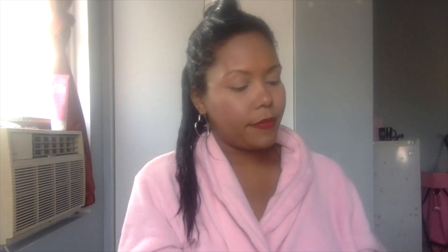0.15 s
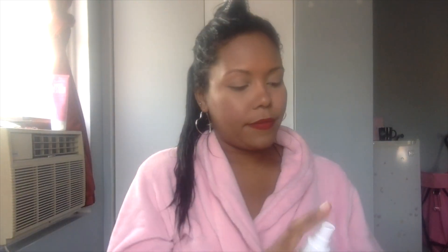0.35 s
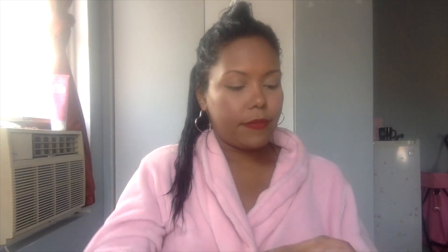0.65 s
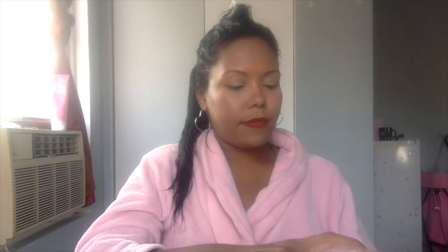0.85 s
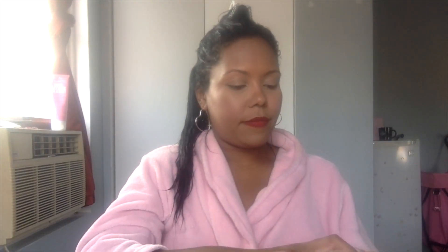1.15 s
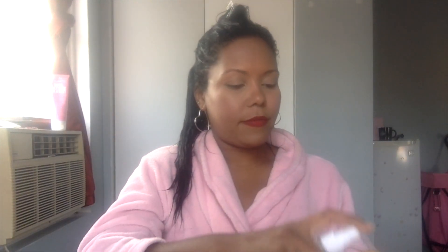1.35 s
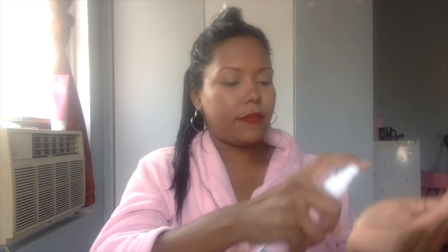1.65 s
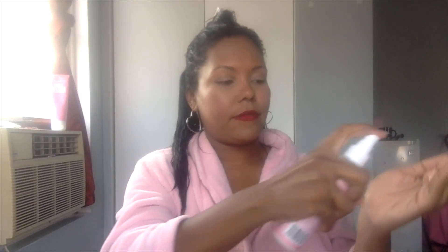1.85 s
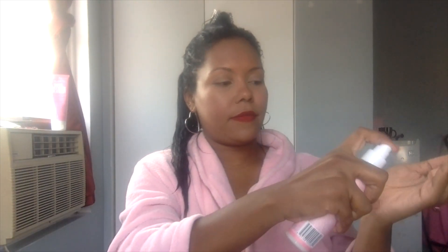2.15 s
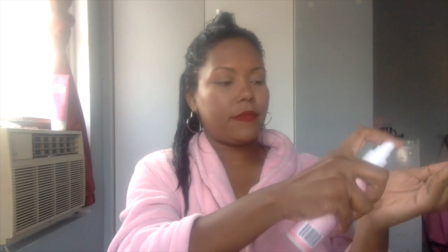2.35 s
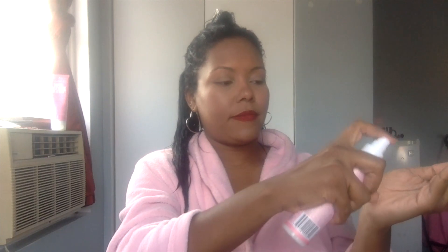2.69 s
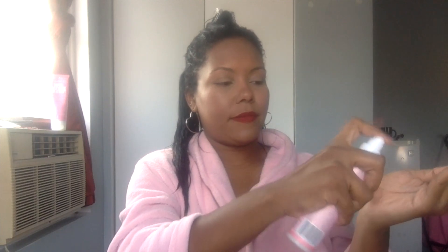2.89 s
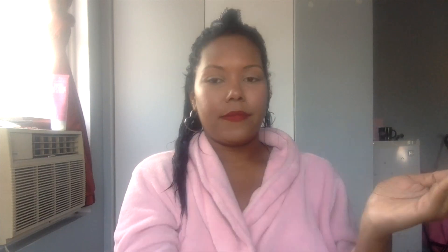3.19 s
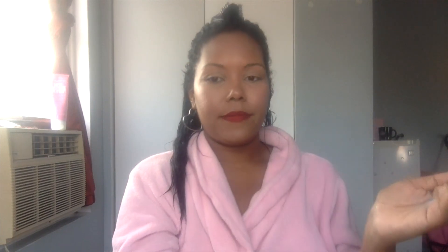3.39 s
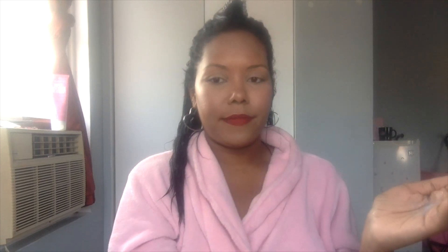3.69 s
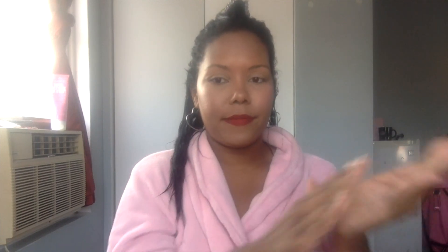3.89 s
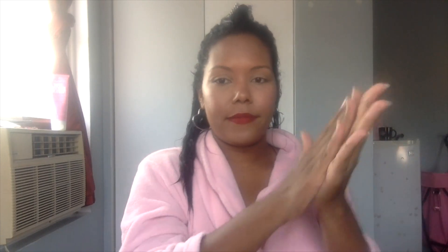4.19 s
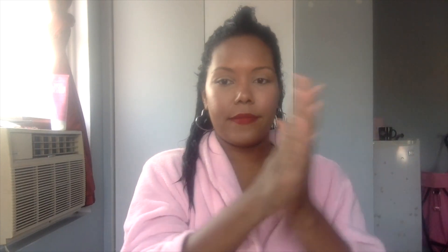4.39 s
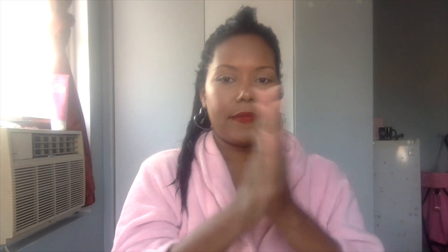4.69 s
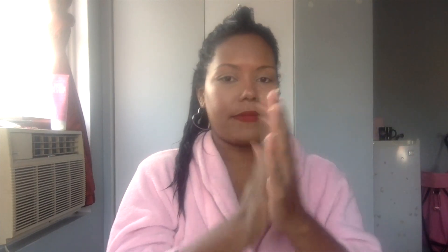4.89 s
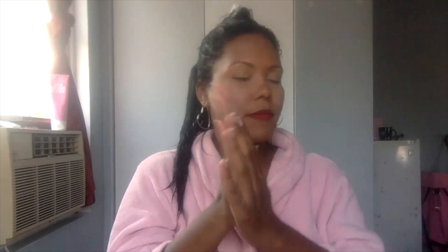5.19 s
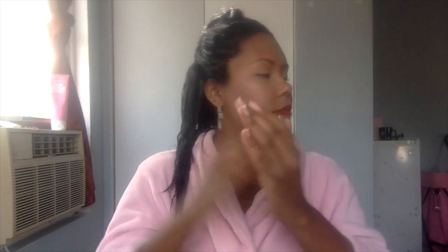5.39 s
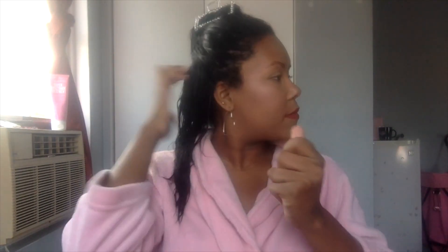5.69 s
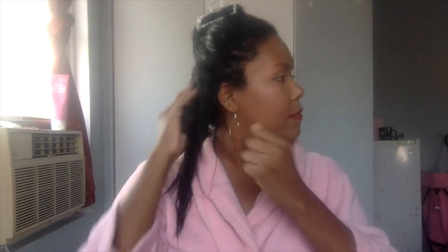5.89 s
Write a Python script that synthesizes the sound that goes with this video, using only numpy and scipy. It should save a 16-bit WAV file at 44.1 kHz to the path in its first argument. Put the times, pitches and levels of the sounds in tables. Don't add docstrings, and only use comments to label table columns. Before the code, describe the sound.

A quiet small room hums low, with faint air and cloth rustle. At about 0.1 s a plastic bottle base cracks onto a wooden table with a small thud. Sparse, tiny, falling bird chips begin. Small taps precede a soft, slower spray hiss at 1.1 s, lasting about a quarter second. Sharper valve snaps and a little piston squeak start a quick hiss at 2.1 s, then another at 2.7 s; plastic ticks surround them. At 3.4 s a very loud, tight double knock strikes the wood, clipping the small microphone. Palms rub lightly from 4.0 s, a hard bright clack rings and bounces at 4.6 s, a dry flick snaps at 4.86 s, and wet pats cluster at 4.95 s, trailing into soft rubbing. Light taps come around 5.3 s. High bird chips, now denser, continue to the end at six seconds.

```python
import sys
import numpy as np
from scipy import signal
from scipy.fft import rfft, irfft, next_fast_len
from scipy.io import wavfile
from scipy.ndimage import uniform_filter1d, map_coordinates

SR = 44100
rng = np.random.default_rng(int(sys.argv[2]) if len(sys.argv) > 2 else 0)


def dump(signal):
    limited = np.clip(np.atleast_2d(signal).T, -1, 1)
    pcm = np.round(limited * 32767).astype(np.int16)
    wavfile.write(sys.argv[1], SR, pcm)


def elevation(decibels):
    levels = np.asarray(decibels, float)
    return 10 ** (levels / 20)


N = 266805

# time in seconds, level in dB.
STIR = [(0, -64.5), (.4, -68), (.9, -70), (1.28, -60.5), (1.45, -64), (1.85, -71), (2.25, -62), (2.6, -65),
        (2.9, -60), (3.35, -66), (3.55, -62.5), (4.3, -65.5), (4.85, -60), (5.3, -61), (5.75, -66)]
# frequency in Hz, level in dB per Hz.
HUM_COLOUR = [(15, -55), (25, -20), (37, -25), (67, -12), (97, 7.5), (119, 0), (162, -9.5), (267, 1.5),
              (354, -3), (501, -10.5), (700, -12), (910, -44), (1540, -120)]
AIR_COLOUR = [(290, -32), (500, -12.5), (763, -4.5), (1020, 1), (1560, -5), (1980, -9.5), (3140, -8.5),
              (4050, -10.5), (5970, -10.5), (7880, -18.5), (9000, -25.5), (11700, -51), (19800, -120)]
RUSTLE_COLOUR = [(4000, -31.5), (7000, 0.5), (9000, 4.5), (12000, 2), (15500, 2), (16200, -34.5)]
# frequency in Hz, time to fall 60 dB in seconds.
WALL_DECAY = [(100, 0.36), (500, 0.18), (2000, 0.31), (6000, 0.3), (8000, .24), (10000, .15), (14000, 0.12)]
# delay in seconds, level in dB.
WALL_ECHOES = [(.0045, -8.5), (.008, -8.5), (0.016, -19), (0.024, -24.5), (0.028, -23)]

# start in seconds, length in ms, starting pitch in Hz, peak in dB.
HIGH_CHIPS = [(.665, 6.4, 6470, -48), (.8635, 5.1, 6640, -52.5), (.9545, 9, 6450, -57.5),
              (1.4712, 7.2, 6620, -36.5), (1.5739, 6.8, 6500, -34), (1.7834, 10.4, 6460, -44),
              (2.2534, 8.6, 6560, -36), (2.4829, 13, 6600, -56), (2.6151, 10.5, 6520, -27.5),
              (3.073, 14.4, 6700, -31), (3.4462, 11, 6700, -28), (3.5614, 10, 6350, -28.5),
              (3.7445, 7.4, 7410, -44.5), (3.7889, 11.2, 6530, -25.5), (3.8118, 17, 7100, -42),
              (4.2663, 14.2, 7020, -32.5), (4.631, 12, 6630, -25.5), (4.738, 14, 6600, -29.5),
              (4.9917, 8, 6460, -30), (5.0834, 7.8, 6330, -31), (5.4436, 10.9, 6800, -25),
              (5.5604, 11.7, 6550, -29.5), (5.5848, 9.5, 6600, -40), (5.9395, 16, 6700, -42)]
# start in seconds, length in ms, starting pitch in Hz, peak in dB.
MID_CHIPS = [(1.2646, 12, 6500, -43.5), (1.8792, 6.9, 6200, -32), (2.3856, 12, 6130, -29),
             (2.5417, 8, 6080, -23), (2.5796, 6, 5900, -55), (2.7483, 12.4, 6180, -26),
             (2.9852, 6.6, 6130, -27), (3.2287, 9.8, 5890, -31), (3.3758, 3.6, 5840, -28),
             (3.7205, 6.9, 5830, -31.5), (3.8677, 4.5, 5780, -32), (3.9116, 13, 6410, -23.5),
             (4.1885, 6.6, 6200, -32), (4.3322, 10, 5920, -58.5), (4.403, 20, 6590, -31.5),
             (4.5706, 4.2, 5760, -31), (5.2226, 9.2, 6320, -30), (5.3763, 3.05, 5600, -37),
             (5.718, 15, 5740, -47), (5.8702, 7.9, 5830, -46)]
# start in seconds, length in ms, starting pitch in Hz, peak in dB.
LOW_CHIPS = [(.0554, 8.1, 5500, -40), (.3717, 15, 5240, -34), (2.9348, 9.4, 5110, -42.5),
             (3.327, 12, 4577, -41), (3.6677, 12.3, 4570, -40.5), (4.0139, 9.5, 5460, -35.5),
             (4.0553, 12.2, 5660, -33)]
# start in seconds, length in ms, starting pitch in Hz, peak in dB.
PEEPS = [(.1492, 11, 5130, -36.5), (1.0147, 7, 4800, -52), (1.4128, 19, 5400, -57),
         (3.1723, 9.7, 5196, -52.5), (4.1171, 9.7, 7090, -54), (4.1386, 13.5, 5260, -43),
         (4.191, 6.3, 7200, -50), (4.3501, 8, 5450, -41.5), (4.7345, 5, 7150, -28.5),
         (4.84, 12.2, 5360, -38.5), (5.0785, 8.5, 7100, -36), (5.09, 25, 7250, -50),
         (5.115, 34, 7250, -49.5), (5.6711, 5.5, 8170, -57.5)]
# frequency in Hz, level in dB.
BEAK = [(3300, -26), (4000, -15), (4550, -17), (5000, -3), (6000, -1), (8500, 0.5)]
# time in seconds, pitch in Hz, level in dB.
WHISTLE = [(3.365, 7170, -61.5), (3.385, 7140, -67), (3.405, 7290, -62), (3.475, 7720, -57.5),
           (3.597, 7305, -49.5), (3.617, 7360, -69), (3.659, 7500, -53), (3.671, 7530, -78.5),
           (3.751, 7427, -80), (3.77, 7500, -88.5)]

# time in seconds, peak in dB.
CREAKS = [(2.402, -56), (2.465, -50), (2.665, -49), (2.991, -51), (3.021, -55), (3.096, -50), (3.105, -41),
          (5.279, -44), (5.349, -47)]
# frequency in Hz, level in dB per Hz.
CREAK_COLOUR = [(1000, -30), (2500, -4), (6000, 0), (9000, 0), (15000, -8), (16200, -35)]
# time in seconds, peak in dB, ring in Hz, second ring in Hz,
# level of the second ring in dB.
TAPS = [(1.046, -47.5, 970, 3120, -16), (1.279, -36, 4620, 3900, -11), (1.31, -46, 7030, 4000, -16),
        (1.338, -37, 1390, 2470, 1), (2.044, -56, 7600, 11200, -10), (2.392, -56, 7300, 8100, -5),
        (2.421, -51, 7300, 6900, -8), (2.465, -51, 9000, 4900, 0), (2.668, -49, 7100, 8450, -7),
        (2.989, -48, 2780, 2230, -5), (3.099, -34.5, 8330, 6940, 0.5), (3.103, -40.5, 7540, 10000, -4.5),
        (5.176, -42.5, 880, 1460, -4), (5.278, -25.5, 3200, 2330, -6.5), (5.347, -28, 1484, 3930, -4),
        (5.371, -39, 2720, 2480, 0.5)]

# start in seconds, attack in seconds, hold in seconds, release in seconds, level in dB.
RUBS = [(.06, 0.012, 0.055, 0.036, -51), (4.0, 0.062, 0.057, 0.13, -58.5), (5.25, 0.061, .05, .15, -58.5),
        (4.36, 0.068, 0.04, 0.089, -43), (4.935, 0.018, .03, 0.13, -40.5), (5.03, 0.084, 0.0077, 0.77, -51)]
# frequency in Hz, level in dB per Hz.
SKIN_COLOUR = [(880, -47.5), (1500, -24), (2340, -18), (2930, -7), (3740, -9.5), (4190, -7), (5120, -11),
               (7440, -7.5), (9910, -23.5), (12000, -47), (15600, -54.5), (22000, -120)]
# time in seconds, peak in dB.
PATS = [(4.9472, -17), (4.953, -22.5), (4.9616, -18), (4.965, -24), (4.970, -20.5), (4.9735, -46),
        (4.986, -45)]
# frequency in Hz, level in dB per Hz.
PAT_COLOUR = [(200, -30), (500, -8.5), (950, 1), (1800, -5.5), (2800, 3.5), (4500, -8.5), (6000, -40),
              (8000, -20), (9900, -17.5), (11800, -38.5), (14500, -29), (16000, -56)]
# time in seconds, peak in dB.
FLICKS = [(4.8625, -0.5)]
# frequency in Hz, level in dB per Hz.
FLICK_COLOUR = [(470, -76), (800, -62), (1850, -27.5), (2210, -17), (2800, -6.5), (4290, -1), (6820, -10.5),
                (7830, -21), (8340, -43), (16000, -61)]
# time in seconds, peak in dB.
CLACKS = [
    (4.5795, -14),
    (4.581, 1),
]
# time in seconds, peak in dB.
REBOUNDS = [
    (4.5897, -16),
    (4.5915, -10.5),
    (4.611, -15),
]
# frequency in Hz, width in Hz, level in dB.
CLACK_RINGS = [(1301, 188, 1), (2943, 250, -9), (3340, 110.4, 4), (3450, 22, 8.5), (3650, 350, -1),
               (4050, 200, -10), (6700, 260, -1), (7150, 160, 5), (7520, 180, -5), (8493, 240, -18.5),
               (10200, 230, -21.5), (12300, 1200, -15), (14350, 250, -25)]

# time in seconds, thud in dB, crack in dB, contact time in seconds.
BLOWS = [
    (0.072, -22.5, -27, 0.0046),
    (0.094, -28.5, -3.5, 0.00065),
    (0.102, -19, -15, 0.0003),
    (3.396, -50.5, -40, 0.0013),
    (3.409, 1, 0.5, 0.00016),
    (3.412, 1.5, -10.5, 0.00021),
]
# frequency in Hz, width in Hz, level in dB.
TABLE_RINGS = [(98.5, 69, -11.5), (128, 24, 0), (189, 40, -4), (273, 52, -4), (383.6, 37, 1), (562, 87, -7),
               (830, 65, -5), (999, 38, -4), (1267, 84, -9.5)]
# frequency in Hz, level in dB per Hz.
CRACK_COLOUR = [(500, -13), (1000, -4.5), (1700, -12.5), (2700, -11.5), (3400, -12), (4150, -9.5),
                (5000, -16.5), (9600, -15), (14500, -27), (16400, -52.5)]
# frequency in Hz, width in Hz, level in dB.
RIM_RINGS = [(1480, 220, -31), (4400, 470, 16.5), (4940, 490, 17.5), (7080, 270, -37), (9150, 630, 5),
             (13000, 1000, -22)]

# time in seconds, length in ms, pitch in Hz, peak in dB.
SQUEAKS = [(1.058, 6, 3060, -52.5), (2.027, 5, 3080, -46), (2.0425, 6.5, 3080, -29.5),
           (2.084, 4, 3100, -38), (2.094, 5, 3460, -43), (2.661, 6, 3070, -38), (2.666, 6, 3210, -38.5),
           (2.700, 4, 4830, -34), (2.703, 4, 4400, -32), (2.702, 4, 3350, -44)]
# time in seconds, peak in dB, level in dB of the puff after it against the snap.
VALVE_SNAPS = [(1.106, -43, -4.5), (1.117, -42, -4), (1.1292, -26.5, -12), (1.1324, -30, -13),
               (1.1364, -29, -14), (2.0716, -13.5, -27), (2.080, -30, -9.5), (2.0858, -15, -19.5),
               (2.087, -25, -21), (2.1259, -13.5, -22.5), (2.130, -26, -9.5), (2.150, -38, -28),
               (2.178, -17.5, -24), (2.1793, -11, -23), (2.2268, -18, -22.5), (2.229, -16, -16.5),
               (2.7005, -19, -12), (2.703, -7, -21), (2.706, -14, -20), (2.7762, -23, -15)]
# frequency in Hz, level in dB per Hz.
SNAP_COLOUR = [(1470, -61.5), (3000, -35), (4730, -38), (5900, -23.5), (7400, 1), (8860, -8), (10700, -9),
               (11900, 4), (13200, -6.5), (14400, 2.5), (15700, -2.5), (16300, -28)]
# start in seconds, attack in seconds, hold in seconds,
# release in seconds, level in dB.
JETS = [
    (1.07, 0.063, 0.093, 0.08, -40),
    (2.07, .003, 0.19, 0.028, -41.5),
    (2.699, .007, .16, 0.032, -40),
]
# start in seconds, attack in seconds, hold in seconds,
# release in seconds, level in dB.
MISTS = [
    (1.085, 0.062, 0.083, 0.062, -36.5),
    (2.11, 0.069, 0.082, 0.013, -51),
    (2.70, 0.026, 0.14, 0.02, -50),
]
# frequency in Hz, level in dB per Hz.
FIRST_JET_COLOUR = [(5000, -41), (6000, -12), (7300, -1), (8600, -6.5), (10000, 0), (10800, -11),
                    (11800, -10), (13200, -25), (14300, -7), (15500, -8), (16000, -45)]
JET_COLOUR = [(4500, -40), (5630, -12.5), (6670, -2), (7300, 4), (8700, -8.5), (9960, 1), (10800, -9),
              (11800, 0.5), (12600, -10), (13300, -16.5), (14200, -3), (15600, -1.5), (16100, -36.5)]
MIST_COLOUR = [(530, -50.5), (900, -26), (1580, -15), (1960, -22), (2700, -3.5), (4300, -1), (5150, -1),
               (5600, -15), (6500, -19), (8450, -42.5), (14300, -120)]
LATE_MIST_COLOUR = [(350, -39.5), (600, -12.5), (1270, -10), (1320, -11), (2000, -13), (2840, -1.5),
                    (3230, -3.5), (4230, -2.5), (6500, -7.5), (8450, -35), (14300, -120)]

HUM_DB, AIR_DB, RUSTLE_DB = -64.5, -64, -76.5
HUM_FOLLOWS, RUSTLE_FOLLOWS = 0.89, 1
JET_SAG_DB_PER_S, FIRST_SAG_DB_PER_S, MIST_SAG_DB_PER_S, RUB_SAG_DB_PER_S = 30.5, 13, -7, 99.5
EDGE_DB = 37
TAP_T60_S, TAP_CLICK_DB = 0.013, -12
HOOK_MS = 0.67


def unit(x):
    return x / np.sqrt(np.mean(x ** 2) + 1e-20)


def along(points, hz):
    f, v = np.transpose(points)
    return np.interp(np.log(hz + 1), np.log(f + 1), v)


def curves(rows):
    s, *columns = np.transpose(rows)
    return [np.interp(np.arange(N) / SR, s, column) for column in columns]


def wobble(rate):
    knots = rng.standard_normal(int(N * rate / SR) + 4)
    return map_coordinates(knots, [np.arange(N) * rate / SR])


def noise(colour, grain_db, rate, patchy_db=1.5):
    grainy = rng.standard_normal(N) * elevation(grain_db * wobble(rate))
    z = signal.stft(grainy, nperseg=256)[2]
    patches = uniform_filter1d(rng.standard_normal(z.shape), size=5, axis=0)
    patches = uniform_filter1d(patches, size=12, axis=1)
    x = signal.istft(z * elevation(patchy_db * unit(patches)), nperseg=256)[1][:N]
    m = next_fast_len(N + 8192)
    gain = elevation(along(colour, np.fft.rfftfreq(m, 1 / SR)))
    return unit(irfft(rfft(x, m) * gain, m)[:N])


def swells(rows, sag_db_per_s):
    t, out = np.arange(N) / SR, np.zeros(N)
    for s, attack, hold, release, db in rows:
        climb = EDGE_DB * np.minimum((t - s) / attack - 1, 0)
        sink = EDGE_DB * np.maximum(t - s - attack - hold, 0) / release
        sag = sag_db_per_s * np.maximum(t - s - attack, 0)
        out += elevation(np.maximum(db + climb - sink - sag, -200))
    return out


def causal(colour, size=2048):
    c = irfft(np.log(elevation(along(colour, np.fft.rfftfreq(size, 1 / SR))) + 1e-6))
    c[1:size // 2] *= 2
    c[size // 2 + 1:] = 0
    return irfft(np.exp(rfft(c)))


def resonant(modes, size=4096, notched=False):
    f = np.fft.rfftfreq(size, 1 / SR)
    response = 0
    for k, (centre, width, db) in enumerate(modes):
        sign = 1 if notched else (-1) ** k
        response = response + sign * elevation(db) * 1j * f * width / (centre * centre - f * f + 1j * f * width)
    return irfft(response) * np.hanning(2 * size)[size:]


def contact(impulse, t60, push=1e-6, scrape_db=-9):
    t = np.arange(SR // 10) / SR
    force = elevation(scrape_db - 60 * t / t60) * rng.standard_normal(len(t))
    force[0] = 1
    force = signal.fftconvolve(force, (1 + t * SR) * np.exp(-t / push))
    x = signal.fftconvolve(force, impulse)
    return x / abs(x).max()


def in_room(x, wet_db, echo_db, damping=1):
    hz, t, z = signal.stft(rng.standard_normal(SR // 3), SR, nperseg=256)
    decay = elevation(-60 * damping * t / along(WALL_DECAY, hz)[:, None])
    tail = signal.istft(z * decay, SR, nperseg=256)[1]
    i = np.arange(len(tail))
    tail *= 1 - np.exp(-i / (0.00099 * SR))
    tail *= elevation(-25 * (i / (.22 * SR)) ** 4)
    tail *= elevation(wet_db) / np.linalg.norm(tail)
    tail[0] = 1
    for s, db in WALL_ECHOES:
        tail[round(s * SR * rng.uniform(.9, 1.1))] += elevation(db + echo_db) * rng.choice([-1, 1])
    return signal.fftconvolve(x, tail)


def add(track, s, x):
    part = track[round(s * SR):][:len(x)]
    part += x[:len(part)]


def hits(events, impulse, t60, wet_db, echo_db, damping=1.5, scrape_db=-9):
    out = np.zeros(N)
    for s, db in events:
        hit = contact(impulse, t60, scrape_db=scrape_db)
        add(out, s, elevation(db) * in_room(hit, wet_db, echo_db, damping))
    return out


def room_tone():
    stir_db = curves(STIR)[0]
    stir_db = stir_db - stir_db.mean()
    hum_gain = elevation(HUM_DB + HUM_FOLLOWS * stir_db + 2.3 * wobble(4.3))
    air_gain = elevation(AIR_DB + stir_db + 0.92 * wobble(7.5))
    rustle_gain = elevation(RUSTLE_DB + RUSTLE_FOLLOWS * stir_db)
    hum = hum_gain * noise(HUM_COLOUR, grain_db=-0.97, rate=33)
    air = air_gain * noise(AIR_COLOUR, grain_db=0.96, rate=71)
    return hum + air + rustle_gain * noise(RUSTLE_COLOUR, grain_db=0.9, rate=330)


def whistle():
    hz = curves(WHISTLE)[0]
    points = [(s, db) for s, _, db in WHISTLE]
    start, end = (points[0][0] - .01, -120), (points[-1][0] + .02, -120)
    loud = elevation(curves([start, *points, end])[0])
    tone = np.sin(2 * np.pi * np.cumsum(hz + 40 * wobble(60)) / SR)
    tone = loud * elevation(4.0 * wobble(130)) * tone
    return elevation(0.5) * in_room(tone, wet_db=-1.5, echo_db=-1.0, damping=0.71)[:N]


def chip(ms, start_hz, db, fall, peak_ms, t):
    length, slope = ms / 1000, fall * 1000
    top = np.clip(peak_ms / ms, .05, .7) * length
    rise = np.sin(np.pi / 2 * np.clip((t - t[0]) / (top - t[0]), 0, 1)) ** 2
    past = np.maximum(t - top, 0) / (length - top)
    fade = np.minimum(12 * past ** 2.2, 22)
    fade += 60 * np.maximum(t / length - 1.5, 0) ** 2
    hz = abs(start_hz - slope * (np.hypot(np.maximum(t, 0), HOOK_MS / 1000) - HOOK_MS / 2000))
    fade -= along(BEAK, hz) + 1.7 * np.sin(2 * np.pi * (300 * t + rng.uniform()))
    note = rise * elevation(-fade) * np.sin(2 * np.pi * np.cumsum(hz) / SR)
    return elevation(db) * in_room(note, wet_db=-15, echo_db=-8.5, damping=1.6)


def birds():
    out, t = np.zeros(N), np.arange(SR // 25) / SR - .0015
    # notes, fall in Hz per ms, time to the peak in ms
    voices = [(HIGH_CHIPS, 130, 1.4), (MID_CHIPS, 110, 2.4), (LOW_CHIPS, 70, 4.7), (PEEPS, 18, 2.6)]
    for notes, fall, peak_ms in voices:
        for s, ms, start_hz, db in notes:
            add(out, s + t[0], chip(ms, start_hz, db, fall, peak_ms, t))
    return out + whistle()


def creaks():
    return hits(CREAKS, causal(CREAK_COLOUR), 0.004, wet_db=-12, echo_db=-12, scrape_db=-5)


def taps():
    out, t = np.zeros(N), np.arange(SR // 10) / SR
    for s, db, hz, second_hz, second_db in TAPS:
        ring = np.sin(2 * np.pi * hz * t) + elevation(second_db) * np.sin(2 * np.pi * second_hz * t)
        ring *= elevation(-60 * t / TAP_T60_S) * (1 - np.exp(-t / 0.00061)) ** 2
        click = uniform_filter1d(rng.standard_normal(len(t)), size=5)
        ring += elevation(TAP_CLICK_DB - 60 * t / 0.0026) * (t * SR > 6) * click
        soft = uniform_filter1d(ring, size=2) / abs(ring).max()
        add(out, s, elevation(db) * in_room(soft, wet_db=-9.5, echo_db=-5.0, damping=1.2))
    return out


def rubbing():
    return swells(RUBS, RUB_SAG_DB_PER_S) * noise(SKIN_COLOUR, grain_db=2.0, rate=410)


def pats():
    return hits(PATS, causal(PAT_COLOUR), 0.008, wet_db=-1.5, echo_db=-26, scrape_db=-1)


def flick():
    return hits(FLICKS, causal(FLICK_COLOUR), 0.0019, wet_db=-3.5, echo_db=-4, damping=1.19, scrape_db=-20)


def clack():
    shine = causal([(500, -8.5), (1300, 4), (13000, -2), (14600, -6), (15200, -30.5)])
    body = signal.fftconvolve(resonant(CLACK_RINGS, size=8192, notched=True), shine)
    dull_body = signal.fftconvolve(body, causal([(4000, -1), (7500, -2.5), (10000, -23), (16000, -44)]))
    out = hits(CLACKS, body, 0.012, wet_db=-3.5, echo_db=-5, damping=0.54)
    return out + hits(REBOUNDS, dull_body, 0.024, wet_db=-9.0, echo_db=-6, damping=1.0)


def table():
    rim = signal.fftconvolve(resonant(RIM_RINGS), resonant([(6250, 5800, 0)]))
    out = hits([(.0715, -19)], rim, 0.007, wet_db=-16.0, echo_db=-16)
    for s, db, crack_db, push in BLOWS:
        blow = contact(resonant(TABLE_RINGS, size=16384), 0.0054, push, scrape_db=-24)
        crack = contact(causal(CRACK_COLOUR), 0.025, 0.2 * push, scrape_db=-12.0)
        add(blow, 0, elevation(crack_db) * crack)
        add(out, s, elevation(db) * in_room(blow, wet_db=-7.0, echo_db=-2, damping=1.11))
    return signal.sosfilt(signal.butter(4, 82, "high", fs=SR, output="sos"), out)


def squeaks():
    out = np.zeros(N)
    for s, ms, hz, db in SQUEAKS:
        t = np.arange(int(ms * SR / 1000)) / SR
        blip = abs(np.sin(np.pi * t / t[-1])) ** 1.2 * np.sin(2 * np.pi * hz * t)
        add(out, s, elevation(db) * in_room(blip, wet_db=-15.5, echo_db=-10, damping=1.4))
    return out


def valve():
    events = [(s, db) for s, db, _ in VALVE_SNAPS]
    return hits(events, causal(SNAP_COLOUR), 0.004, wet_db=-13.5, echo_db=-14.5, scrape_db=-12)


def spray():
    jet, t = swells(JETS[1:], JET_SAG_DB_PER_S), np.arange(SR // 5) / SR
    for s, db, puff_db in VALVE_SNAPS:
        add(jet, s, elevation(db + puff_db - 60 * t / 0.031))
    first_jet = swells(JETS[:1], FIRST_SAG_DB_PER_S)
    first_mist = swells(MISTS[:1], MIST_SAG_DB_PER_S)
    late_mist = swells(MISTS[1:], MIST_SAG_DB_PER_S)
    hiss = jet * noise(JET_COLOUR, grain_db=2.5, rate=2400, patchy_db=1.0)
    hiss += first_jet * noise(FIRST_JET_COLOUR, grain_db=2.1, rate=1000, patchy_db=-0.5)
    hiss += first_mist * noise(MIST_COLOUR, grain_db=0.0, rate=1000, patchy_db=1.5)
    hiss += late_mist * noise(LATE_MIST_COLOUR, grain_db=1.3, rate=1400, patchy_db=1.5)
    return in_room(hiss, wet_db=-13, echo_db=-12.0)[:N]


def scene():
    background = room_tone() + birds()
    hands = rubbing() + pats() + flick() + clack()
    bottle = creaks() + taps() + table() + squeaks() + valve() + spray()
    return (background + hands + bottle)[None]


def band_limit(x):
    return signal.sosfilt(signal.butter(12, 16510, fs=SR, output="sos"), x)


def record(dry):
    x = signal.sosfilt(signal.butter(2, 45, "high", fs=SR, output="sos"), dry)
    x = x / (1 + abs(x) ** 40) ** (1 / 40)
    return band_limit(x)


dry = scene()
out = record(dry)
dump(out)
```